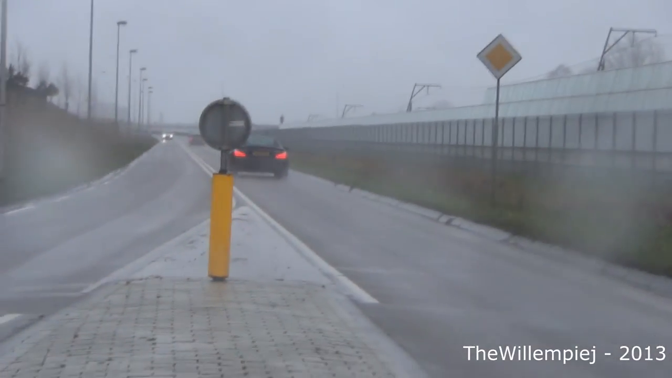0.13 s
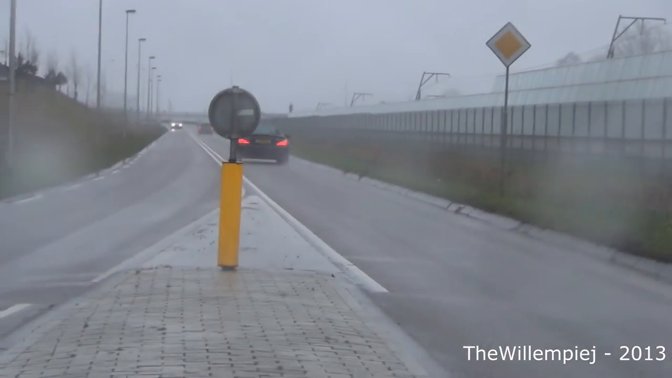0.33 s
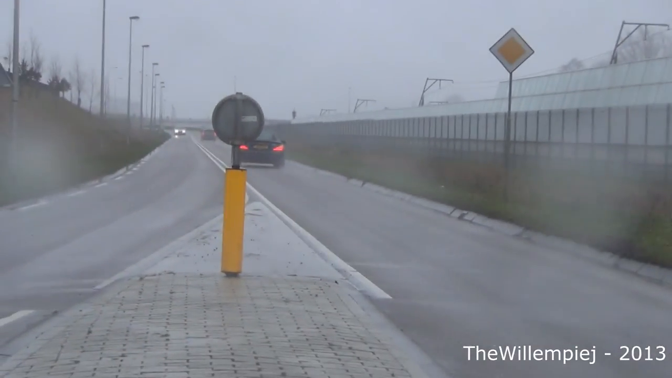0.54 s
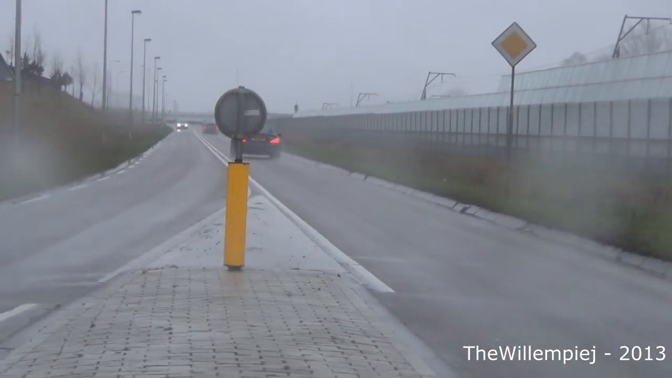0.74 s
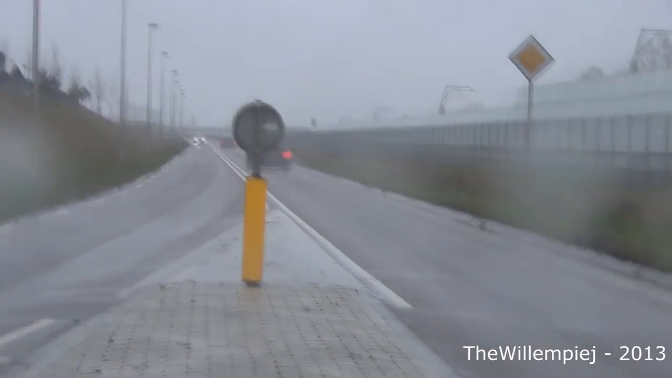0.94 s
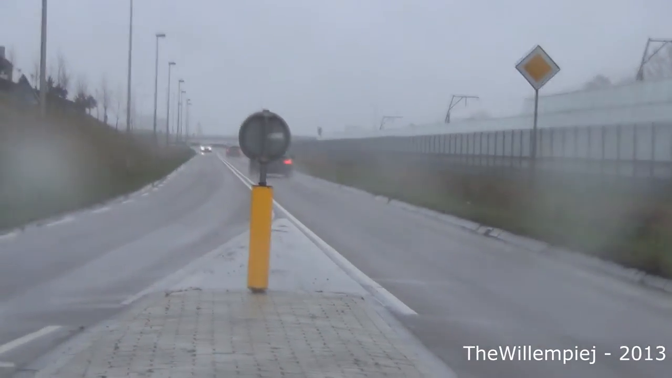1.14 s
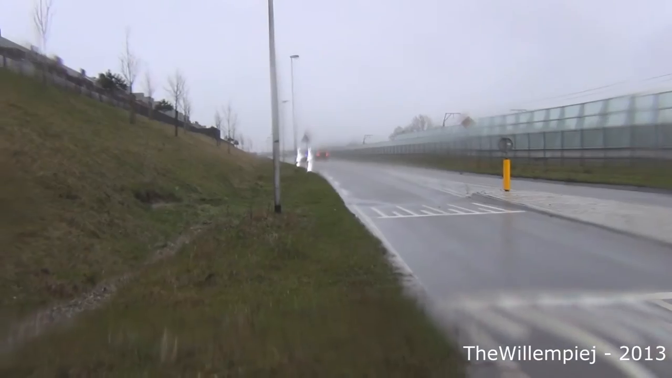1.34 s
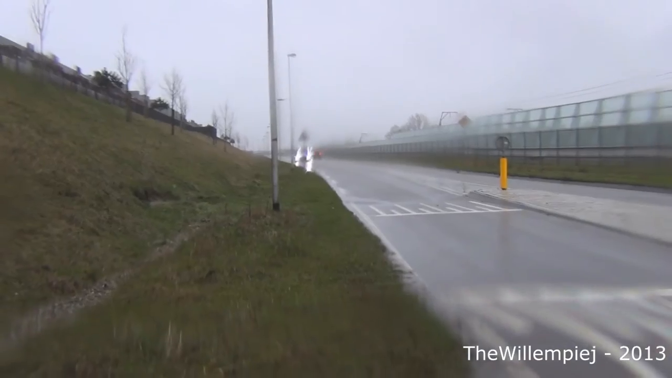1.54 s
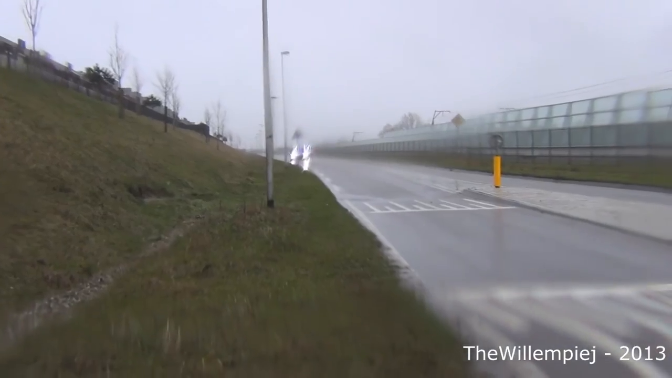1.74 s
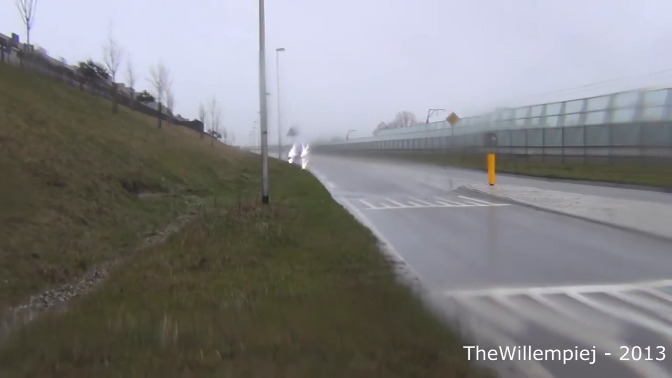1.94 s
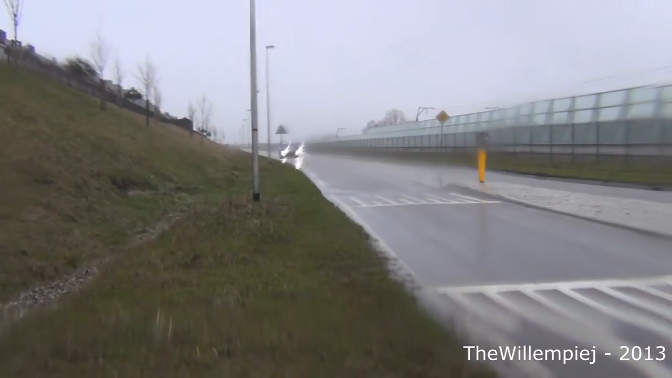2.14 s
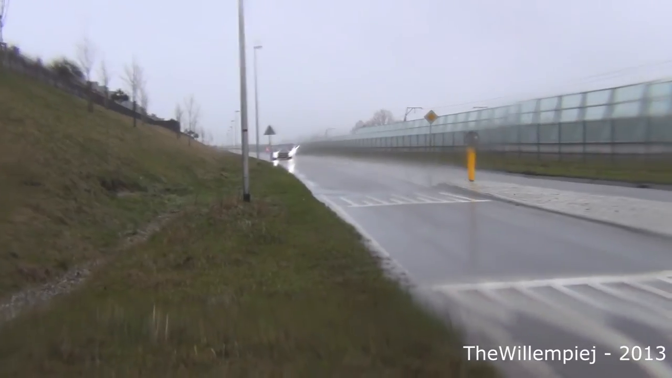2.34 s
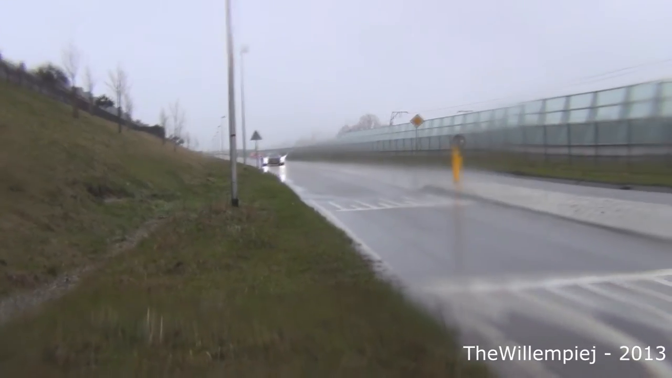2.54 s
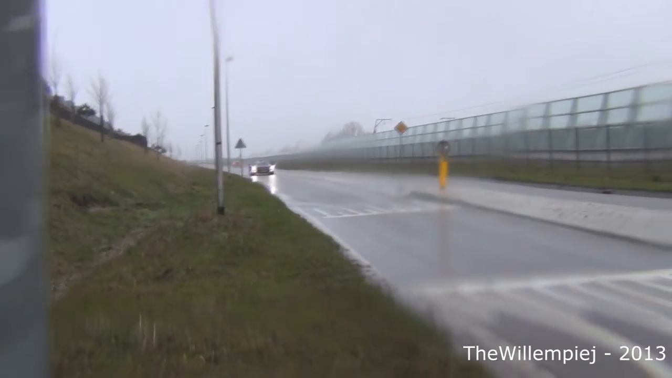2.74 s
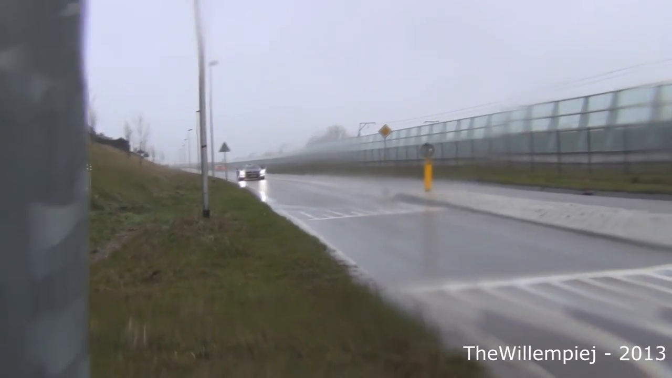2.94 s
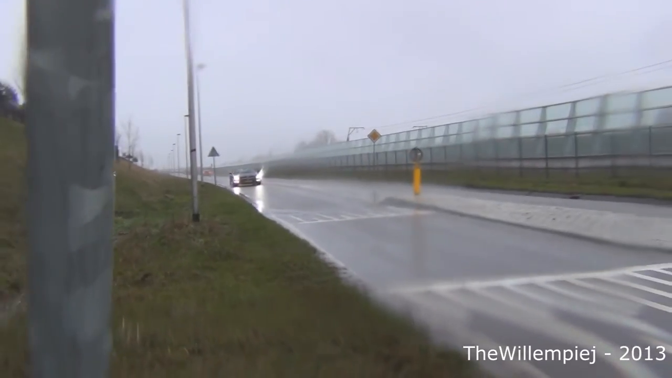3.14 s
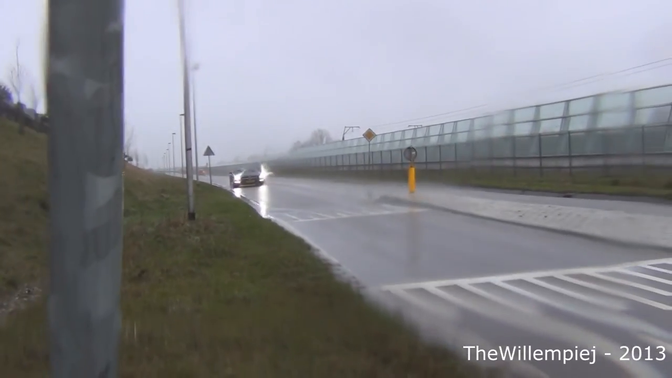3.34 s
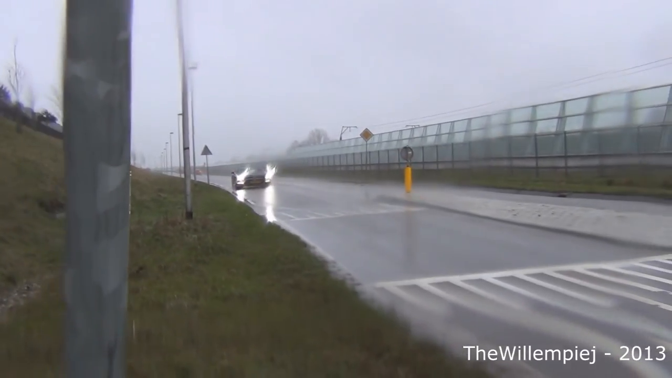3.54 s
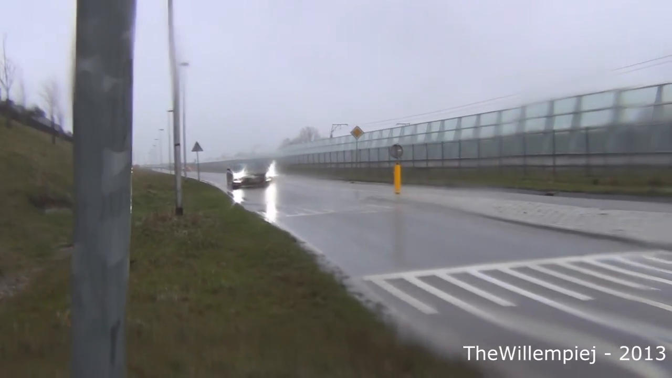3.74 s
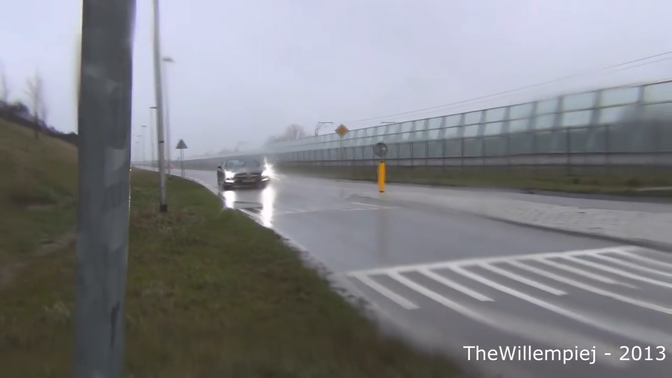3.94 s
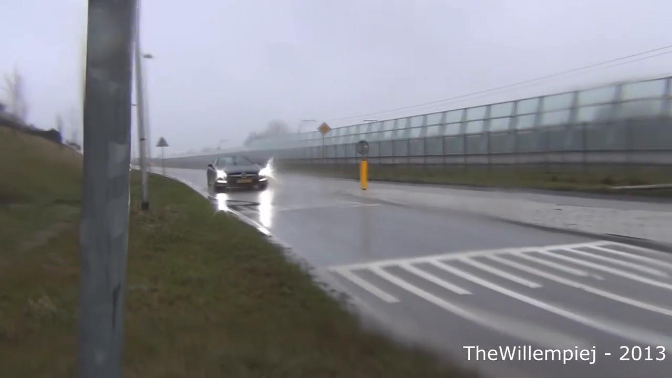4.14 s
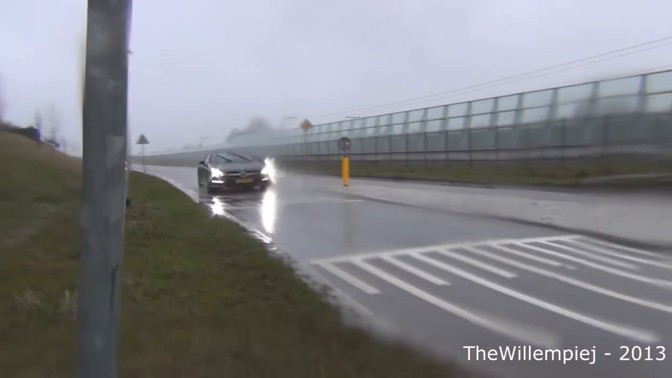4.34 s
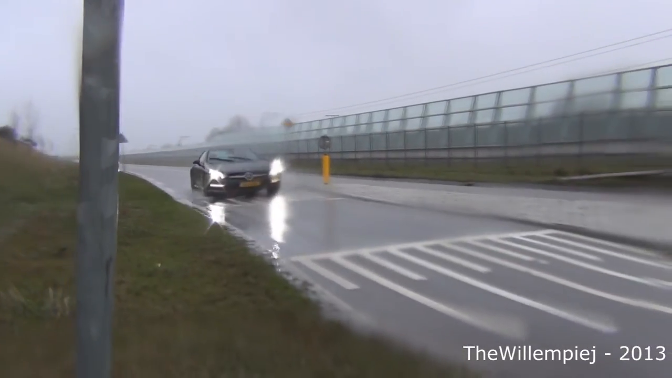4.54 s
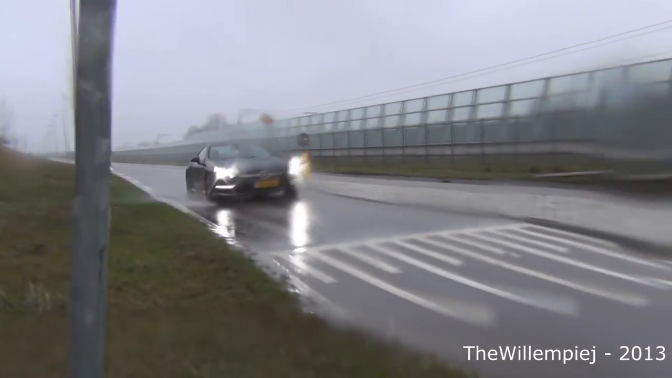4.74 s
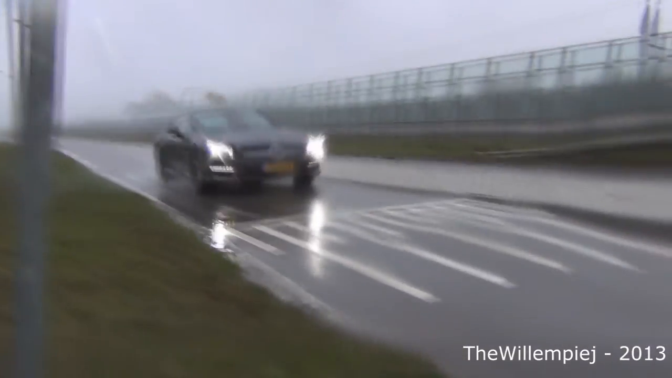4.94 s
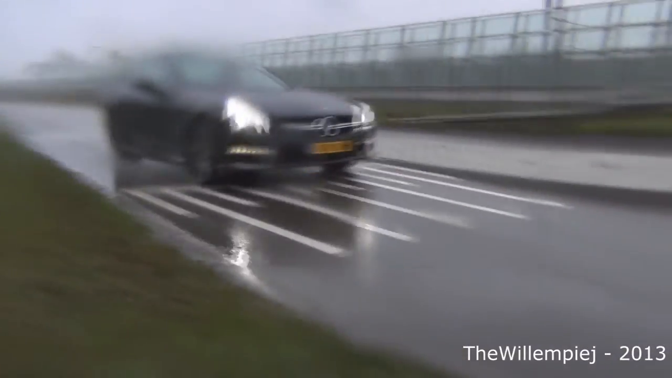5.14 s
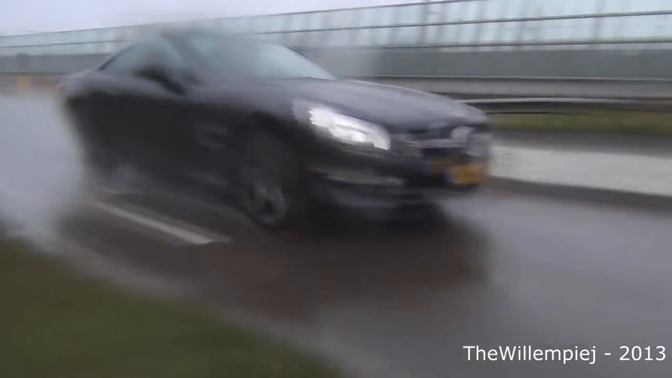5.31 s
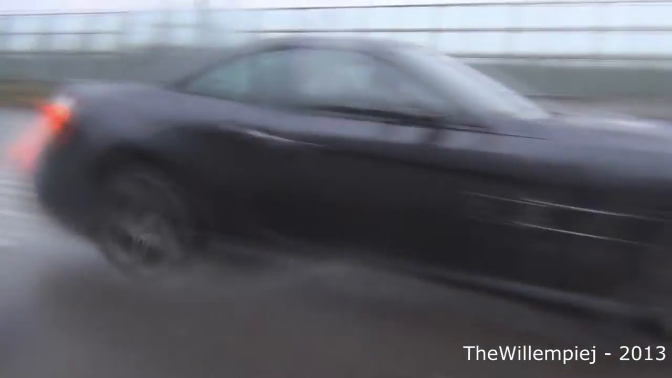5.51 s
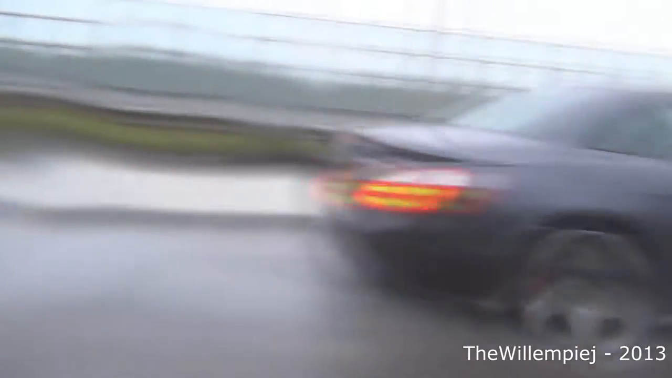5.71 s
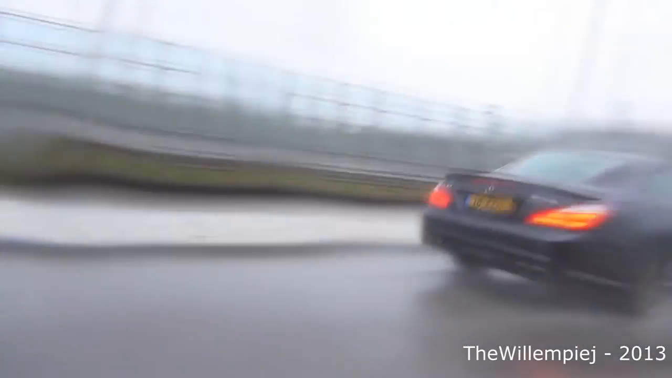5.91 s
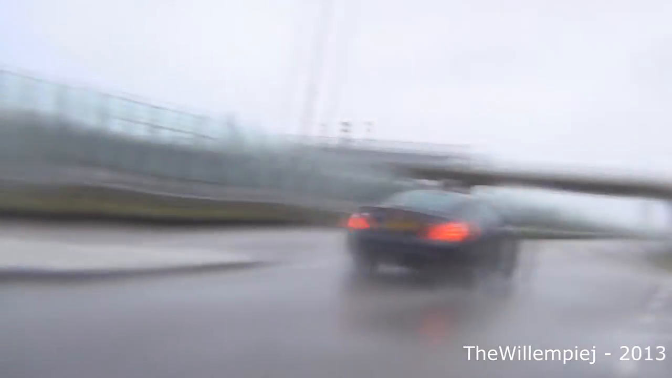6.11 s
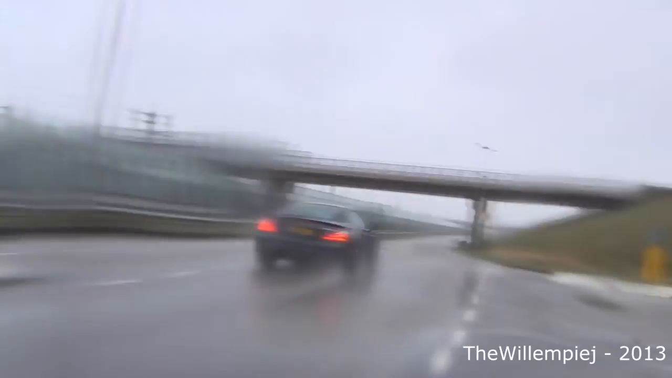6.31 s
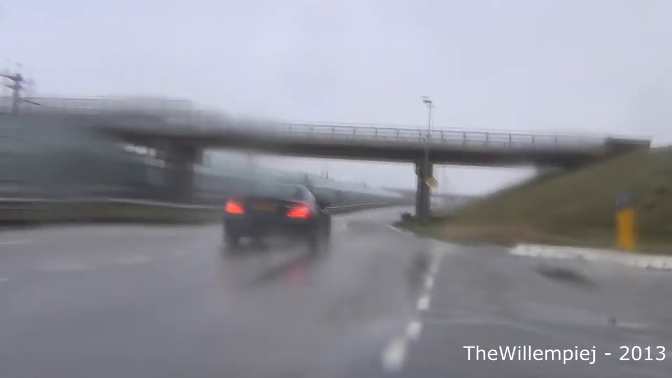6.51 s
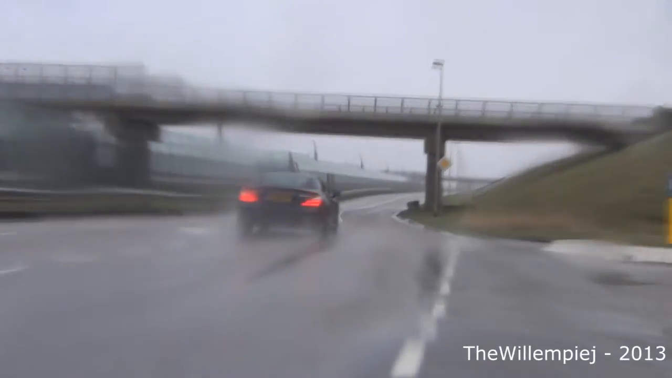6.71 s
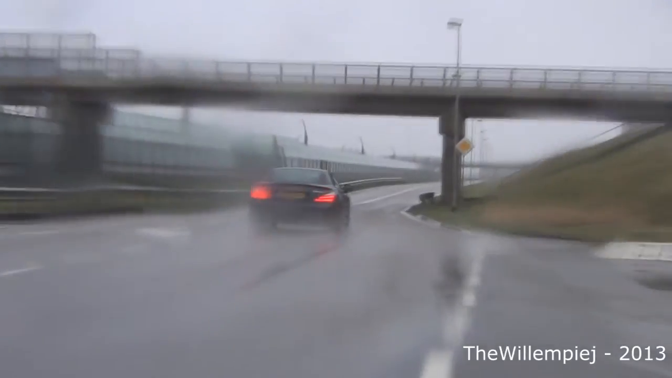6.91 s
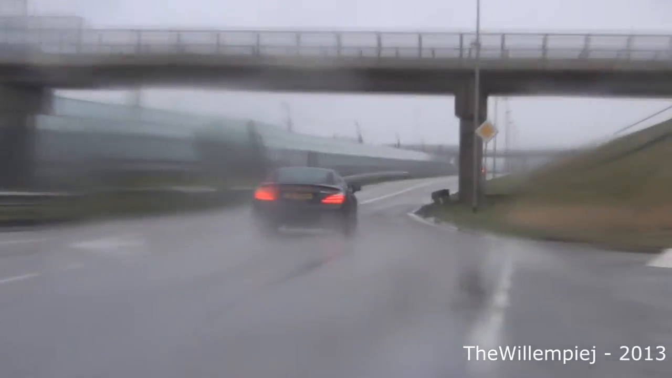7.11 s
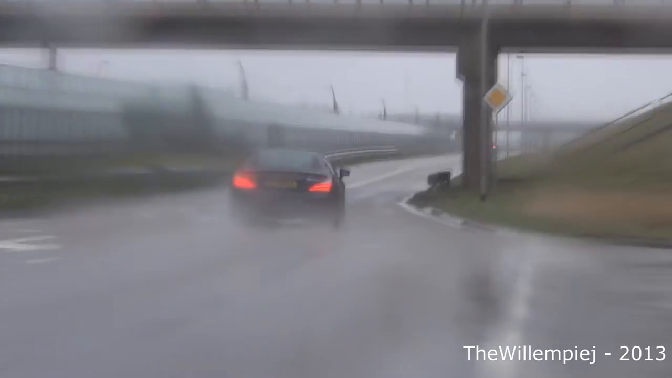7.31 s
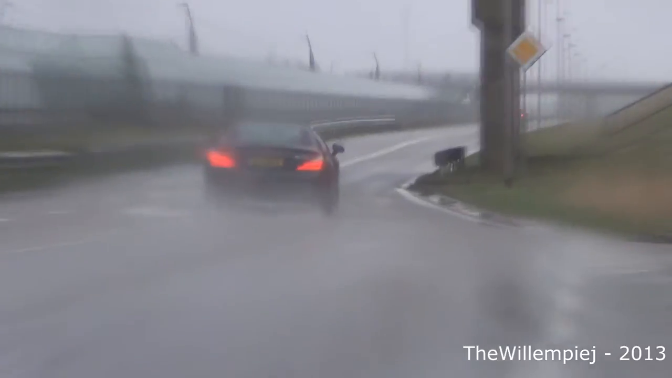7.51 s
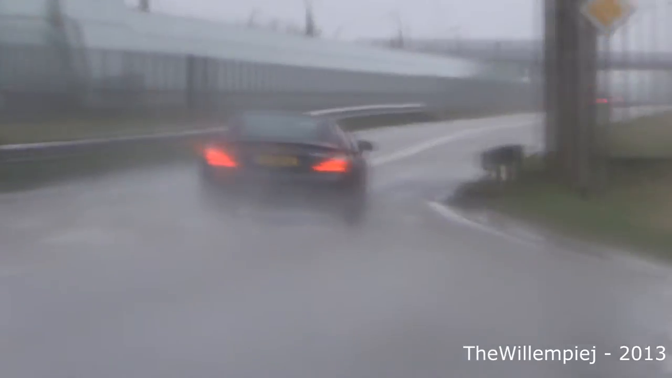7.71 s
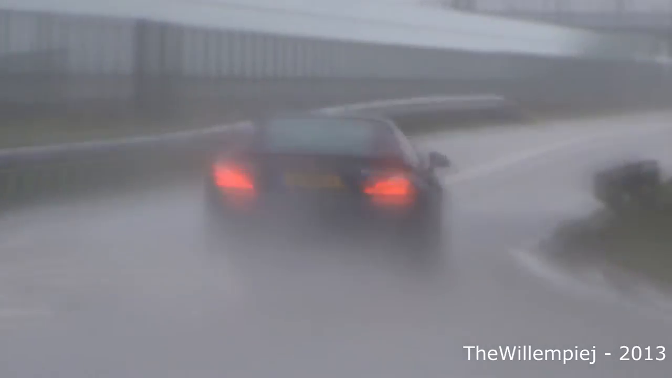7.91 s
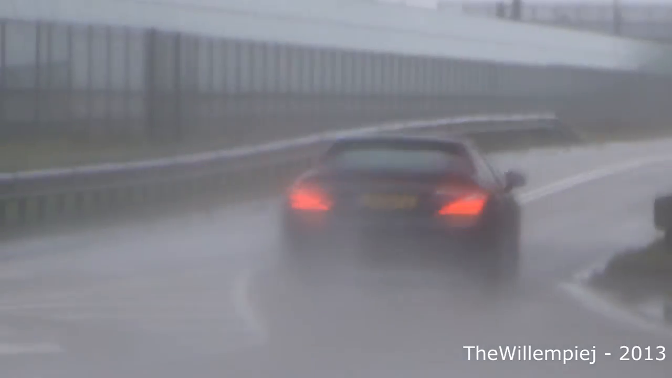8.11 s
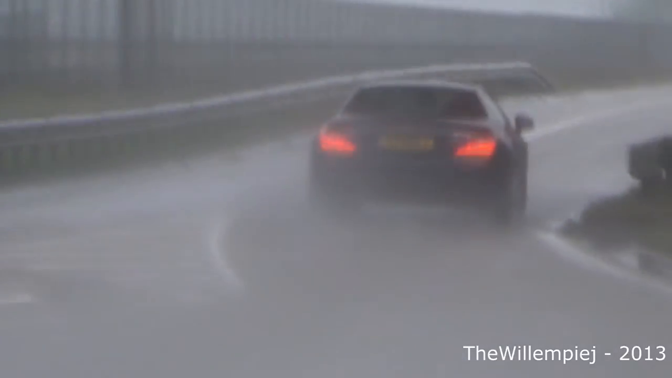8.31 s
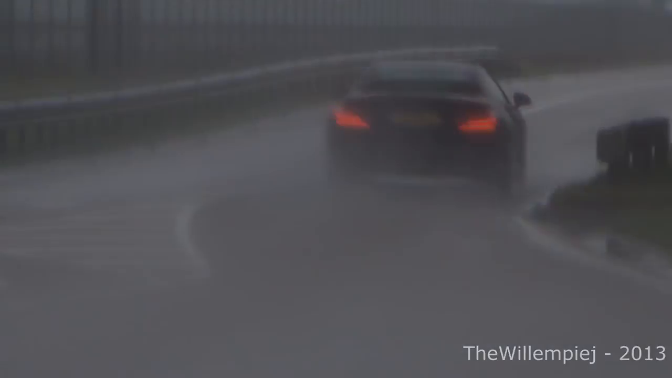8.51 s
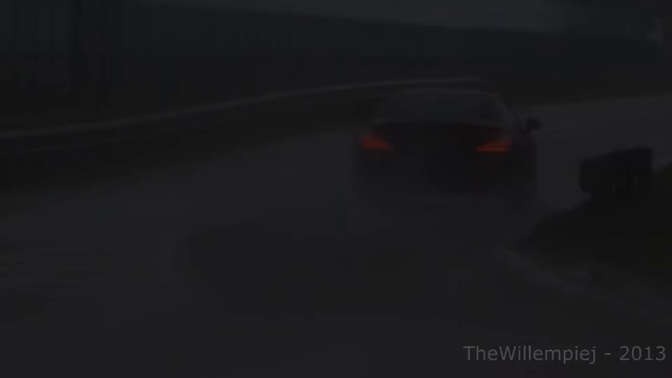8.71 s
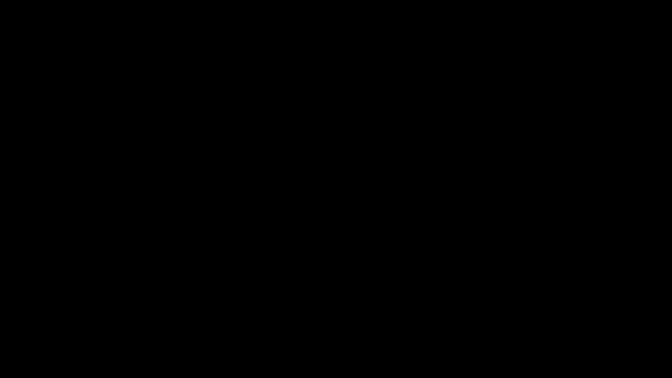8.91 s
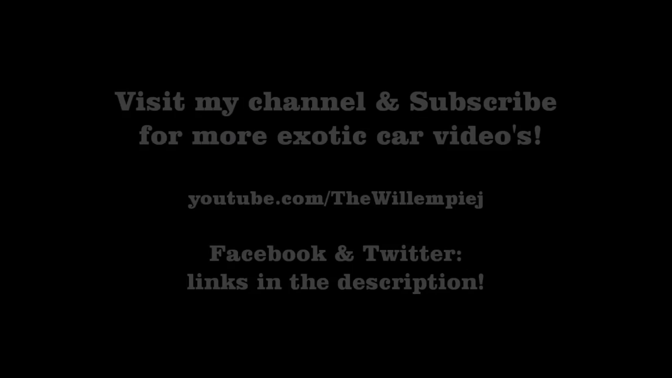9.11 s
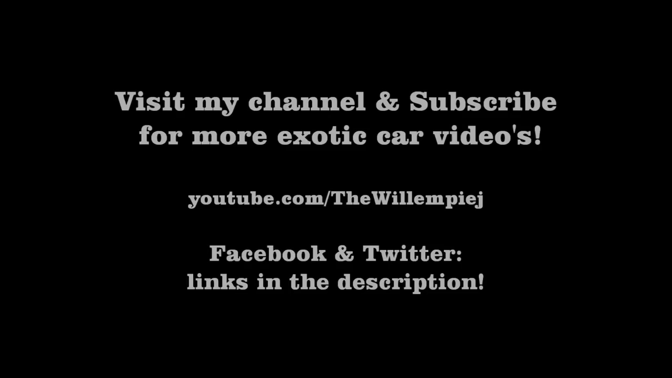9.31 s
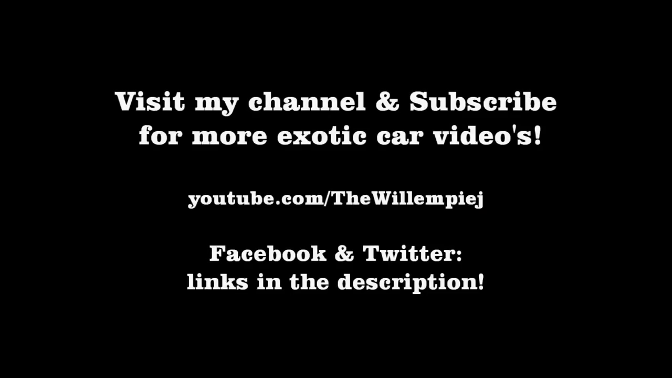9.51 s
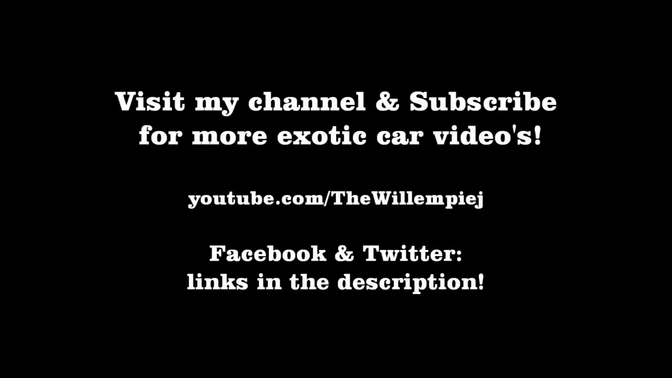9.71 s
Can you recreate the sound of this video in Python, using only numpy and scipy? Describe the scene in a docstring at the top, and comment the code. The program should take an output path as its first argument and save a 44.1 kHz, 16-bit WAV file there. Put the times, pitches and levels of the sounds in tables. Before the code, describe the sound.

From 0 to 1.3 s a powerful eight-cylinder car drives away on a soaked road: steady wet tyre roar and spray, with a hollow exhaust drone rising and strengthening, one small pop and a couple of raindrop clicks. A hard cut at 1.3 s leaves faint distant tyre hiss. From about 2 s exhaust pops appear, becoming a dense irregular crackle from 3 to 4.9 s as tread notes and spray grow; a splash jumps out at 4.65 s. It passes close at 5.5 s with broad watery roar, the engine flaring loudest around 5.6-5.9 s, with two brief tyre chirps and heavy puddle spray. Pitch drops by 6.3 s; tyres recede, splashing. The engine climbs again from 7 s, surging near 8.1 s, then eases into weak hiss, a faint late pop, and silence at 9 s. Low wind rumble stays very faint.

```python
"""The uneven firing of a V8 sounds as engine orders, a ringing tailpipe, throbbing gas noise and short pops.
The car drives away; a hard cut at 1.3 s, then it nears with a popping exhaust, passes close and pulls away.
Wet tyres add shaped noise: roar with an echo, spray, fine mist, tread notes and two slip chirps.
Puddles swell the spray and roar, raindrops click close by, and wind rumbles separately in each channel."""
import sys
import numpy as np
from scipy import signal
from scipy.fft import rfft, irfft, next_fast_len
from scipy.io import wavfile
from scipy.ndimage import uniform_filter1d, map_coordinates

SR = 44100
rng = np.random.default_rng(int(sys.argv[2]) if len(sys.argv) > 2 else 0)


def dump(signal):
    """Clip the signal to [-1, 1] and save it as 16-bit WAV at the path in sys.argv[1]."""
    limited = np.clip(np.atleast_2d(signal).T, -1, 1)
    pcm = np.round(limited * 32767).astype(np.int16)
    wavfile.write(sys.argv[1], SR, pcm)


N = 429970

# the two scenes: start t/s, end t/s
SCENES = [(0, 1.3), (1.3, 9.01)]
# engine, one list a scene, one cycle = two crank turns: t/s, cycle f/Hz, then level/dB of
# tone, boom, sixth order, firing (eighth) order, gas noise
ENGINE_RUNS = [
    [(0.0, 25.57, -42, -38, -53, -43, -39), (0.1, 26, -37, -30.5, -56, -48, -43),
     (0.17, 25.5, -44, -39, -49, -48, -44.5), (0.35, 25.24, -42, -45, -49, -56, -49.5),
     (0.82, 27.06, -47, -40, -47.5, -49, -46.5), (0.9, 27.14, -38, -38, -55, -46, -43.5),
     (1.08, 28.2, -35.5, -29.5, -49.5, -45, -39.5), (1.19, 28.8, -36, -28.5, -49, -44, -42),
     (1.295, 29.34, -34, -23, -58, -46, -37.5)],
    [(4.9, 33.8, -38, -51, -58, -57, -38.5), (5.15, 34.1, -50, -56, -48, -50, -58),
     (5.34, 34.72, -41, -30.5, -44, -40, -39.5), (5.45, 34.9, -45, -28.5, -61, -42, -45),
     (5.53, 38.72, -44, -38, -49, -49, -40), (5.6, 43.34, -34, -27, -51, -40, -34.5),
     (5.66, 44.4, -29, -22.5, -38, -32, -32), (5.71, 39.2, -25, -24, -38, -42, -31),
     (5.76, 33.8, -21.5, -21.5, -48, -35, -31.5), (5.81, 32.75, -25, -18, -42, -34, -33),
     (5.89, 32.82, -38, -34, -60, -39, -36.5), (5.98, 32.17, -34, -28, -36, -53, -30),
     (6.05, 31.5, -47, -27, -43, -54, -30.5), (6.12, 30.44, -43, -25.5, -35, -44, -40),
     (6.18, 27.25, -38, -23, -41.5, -34, -39), (6.27, 22.72, -44, -31.5, -44, -32.5, -38),
     (6.37, 22.9, -31, -52, -46, -35, -41), (6.44, 22.72, -45, -39, -56, -43, -28.5),
     (6.52, 22.84, -37, -48, -49, -38, -40.5), (6.7, 23.27, -45, -48, -54, -44, -49),
     (6.94, 24.33, -41, -41, -58, -46, -36), (7.2, 25.28, -40, -42, -60, -52, -40),
     (7.33, 26.11, -39, -34, -52, -53, -38.5), (7.39, 26.5, -31.5, -28.5, -43, -44, -41.5),
     (7.61, 27.76, -39.5, -33, -45, -45, -36), (7.79, 28.66, -34, -30, -40, -41, -36.5),
     (7.93, 31.14, -34, -33.5, -37, -45, -35.5), (8.0, 33.65, -30, -29, -45, -51, -35.5),
     (8.06, 35.92, -31, -31.5, -36, -35, -36.5), (8.12, 36.9, -32, -30, -48, -41, -31),
     (8.23, 32.7, -50, -36.5, -52, -55, -36.5), (8.41, 30.3, -48, -55, -63, -61, -49),
     (8.6, 31.04, -55, -43.5, -51, -57, -50.5), (8.75, 30.7, -52, -42, -52, -57, -42),
     (9.01, 32, -56, -46.5, -62, -61, -49.5)],
]
# weak orders: multiple of the cycle, relative level/dB
WEAK_ORDERS = [(5, -12.5), (7, -5), (9, -15.5), (11, -11), (12, -7.5), (15, -5), (16, -7.5)]
# stronger orders: multiple of the cycle, level over the tone/dB, gain as the car draws level/dB
STRONG_ORDERS = [(3, -27, 21), (4, -22, 9), (10, -11, 2), (13, -8, 0)]
# fourteenth order: t/s, level/dB
FOURTEENTH_ORDER = [(0, -52), (.08, -40), (.35, -45), (.55, -43), (.8, -53), (1.29, -52), (5, -63),
                    (7.2, -57), (7.45, -47), (7.7, -57), (9, -68)]
# tailpipe boom as heard: t/s, centre f/Hz, width/Hz
PIPE_RESONANCE = [(0, 585, 62.5), (.8, 583.6, 61.5), (1.1, 587, 95.2), (1.29, 587, 100.3), (5.1, 644, 40),
                  (5.5, 659.6, 40.1), (5.63, 640, 60.3), (5.72, 650, 110), (5.82, 635, 109.7),
                  (5.92, 670, 140.2), (6.1, 624, 120.8), (6.2, 595.6, 79.7), (6.3, 591, 70),
                  (6.7, 488.7, 62.5), (7, 510.8, 55), (7.2, 528, 55), (7.4, 548.5, 65), (7.55, 562, 60),
                  (7.7, 583, 50), (7.88, 625, 60), (8.05, 551, 150), (8.2, 573, 120), (9, 594, 69.3)]
# share of the boom's power that rings in clean orders: t/s, share (0-1)
CLEAN_SHARE = [(0, .5), (.8, .9), (1.29, .96), (5.5, .96), (5.6, .3), (5.7, .4), (5.77, .6), (5.86, .6),
               (5.95, .4), (6.1, .65), (6.17, .4), (6.3, .4), (7.15, .6), (7.4, .97), (7.88, .97),
               (8.0, .4), (9, .3)]
# rasp of the gas as the engine pulls: t/s, then level/dB of upper mode, next mode, highest modes
RASP_LEVELS = [(0, -31.5, -35.5, -57), (.45, -34.5, -39, -56), (.8, -40, -53.5, -50),
               (1.29, -33.5, -49, -50), (5.3, -44, -40.5, -39), (5.61, -37, -57, -26.5),
               (5.72, -37, -36, -29.5), (5.82, -46, -44.5, -40.5), (6.0, -42, -34, -37.5),
               (6.12, -51, -41, -41), (6.25, -35, -45.5, -46), (6.5, -39, -42, -42), (7.0, -44, -41, -51),
               (7.2, -36.5, -41, -58), (7.33, -37, -41, -38), (7.46, -34, -40, -32),
               (7.58, -35, -42.5, -34.5), (7.68, -35.5, -35.5, -36.5), (7.75, -36, -36, -33.5),
               (7.86, -31, -31.5, -30), (7.96, -36, -33.5, -33.5), (8.02, -36, -30, -31.5),
               (8.1, -35, -30.5, -28.5), (8.22, -44, -36, -45), (8.4, -50, -40, -45), (9, -48, -42.5, -52)]
# level of the mode just above the boom: t/s, level/dB
HOWL_LEVEL = [(0, -38.5), (.7, -46.5), (1.29, -45.5), (5.3, -43), (5.55, -36.5), (5.63, -28), (5.75, -23.5),
              (5.84, -37.5), (5.92, -36.5), (6.03, -29.5), (6.15, -38.5), (6.3, -39.5), (6.9, -49),
              (7.45, -42.5), (8.1, -46), (8.3, -56), (9, -56.5)]
# pipe modes, whose responses are squared in use: centre f/Hz, width/Hz, level before squaring/dB
HOWL_MODE = [(736, 210, 0)]
UPPER_MODE = [(962, 190, 0)]
NEXT_MODE = [(1433, 340, 0)]
HIGHEST_MODES = [(1900, 490, -1.5), (2402, 240, 4), (2640, 350, 0.5)]
# colour of the gas noise under the orders: f/Hz, relative level per Hz/dB
GAS_COLOUR = [(60, -35.5), (120, -13), (170, -5), (240, -4), (330, -4), (450, -4), (550, -1), (900, -51.5)]
# unburnt fuel popping in the pipe: t/s, relative level/dB, centre f/Hz, relative crack level/dB
POP_EVENTS = [(0.873, -18.5, 420, -8), (2.133, -46, 250, -14), (2.19, -43, 400, -10),
              (2.367, -37, 280, -14), (2.396, -35, 300, -12), (2.488, -30.5, 237, -16),
              (2.551, -26, 382, -14), (2.642, -30.5, 465, -12), (2.676, -24, 430, 1), (2.679, -23, 820, 11),
              (2.685, -49, 237, -5), (2.79, -27, 255, -10), (2.818, -29, 351, -13), (2.906, -18, 197, -11),
              (2.995, -20, 317, -10), (3.004, -17.5, 510, -17), (3.026, -19, 453, -13),
              (3.072, -26, 277, -12), (3.124, -17.5, 393, -5), (3.143, -27, 370, -13),
              (3.207, -25.5, 286, -12), (3.283, -28.5, 385, -10), (3.354, -20, 544, -9),
              (3.494, -29, 471, -11), (3.517, -17, 450, -7), (3.529, -25, 530, 15), (3.544, -21, 351, 12),
              (3.575, -20.5, 310, 8), (3.638, -15, 337, -2), (3.676, -22.5, 310, -12),
              (3.823, -18.5, 299, -12), (3.842, -18.5, 520, -5), (3.859, -19.5, 380, -12),
              (3.905, -15.5, 366, 8), (3.967, -16, 566, -10), (4.009, -27.5, 649, -10),
              (4.073, -22, 632, 9), (4.139, -17.5, 398, 9), (4.161, -23, 614, -4), (4.182, -18, 610, 3),
              (4.214, -21.5, 566, -3), (4.263, -15.5, 248, 3), (4.28, -17, 350, 7), (4.295, -33, 589, 24),
              (4.379, -26, 775, -3), (4.424, -30, 220, -10), (4.474, -19, 403, -5), (4.492, -24, 460, -8),
              (4.505, -16.5, 352, 6), (4.55, -28.5, 764, -2), (4.585, -18, 624, 6), (4.609, -19, 310, 15),
              (4.639, -27.5, 711, -2), (4.675, -22, 425, -9), (4.728, -20.5, 358, -6),
              (4.816, -24.5, 727, -6), (4.908, -23.5, 478, -12), (5.073, -23.5, 813, 11),
              (5.945, -25, 169, -10), (6.926, -24, 400, -10), (7.3, -21, 319, -9), (8.733, -32, 208.3, -14)]
# small pops and distant rumble: t/s, level/dB
BURBLE_LEVEL = [(1.3, -62.5), (1.95, -47), (2.2, -52.5), (2.45, -48.5), (2.8, -45.5), (3.0, -37.5),
                (3.24, -52), (3.55, -34), (3.74, -43.5), (4.05, -33), (4.35, -38.5), (5.3, -38)]
# colour of puffs and burble: f/Hz, relative level per Hz/dB
PUFF_COLOUR = [(40, -41), (100, -9), (250, 1.5), (450, 1), (800, -1), (1500, -49.5)]
# tyres, one list a scene: t/s, roar level/dB, spray level/dB (before splashes and mixing)
TYRE_LEVELS = [
    [(0.0, -25.5, -30.5), (0.6, -24, -27.5), (0.85, -24, -28.5), (1.07, -22.5, -27), (1.295, -22.5, -28.5)],
    [(1.3, -34, -43), (1.75, -36, -42.5), (2.4, -35.5, -38.5), (2.9, -33, -38.5), (3.5, -32.5, -32.5),
     (3.81, -32, -38.5), (4.18, -30.5, -32), (4.5, -28, -29), (4.645, -28, -28.5), (4.655, -24, -27),
     (4.76, -27, -24.5), (4.9, -24, -20.5), (5.4, -21, -19.5), (5.68, -26, -21.5), (5.9, -23, -21),
     (6.15, -24, -21.5), (6.33, -25, -23), (6.49, -26.5, -26), (6.6, -28.5, -30.5), (6.71, -32.5, -35.5),
     (6.86, -29.5, -34), (7.08, -29.5, -29.5), (7.2, -31.5, -33), (7.3, -30.5, -33), (7.6, -31.5, -36),
     (7.97, -33, -38.5), (8.17, -29.5, -36), (8.42, -36, -40.5), (9.01, -39.5, -44.5)],
]
# where the car is heard: t/s, roar left over right/dB, spray left over right/dB
TYRE_PLACE = [(0.0, 1.5, 1.5), (0.53, 3.5, 4.5), (0.85, 8, 4.5), (1.29, 8, -5), (1.31, 0.5, 1.5),
              (1.75, 0.5, 1), (2.5, 1.5, 0), (3.2, 1, 2), (3.7, 1, 0.5), (4.3, 1.5, 0), (5.3, 2.5, 1.5),
              (5.75, 1, -2.5), (6.04, -4, -3.5), (6.5, -1, -1), (6.8, 0.5, -2), (7.3, 1.4, -0.5),
              (9, 0.5, 0)]
# roar colour from the front and from the rear: f/Hz, relative level per Hz/dB
FRONT_COLOUR = [(60, -46.5), (110, -32), (170, -15), (400, -25.5), (750, -5), (1100, -2), (1650, -2.5),
                (2100, -7), (2750, -3.5), (3400, -13), (4300, -11), (5000, -10), (8000, -53.5)]
REAR_COLOUR = [(60, -44), (110, -32.5), (170, -19.5), (400, -12.5), (750, 0.5), (1000, 0.5), (1500, -1.5),
               (1900, -4.5), (2600, -4), (3400, -8), (4300, -11.5), (5000, -11), (8000, -54.5)]
# spray and mist colour: f/Hz, relative level per Hz/dB
SPRAY_COLOUR = [(1500, -20.5), (3500, -11), (4500, -10), (5400, -3), (7200, -3), (8300, -6.5), (10000, -18),
                (12000, -44.5)]
MIST_COLOUR = [(7000, -18.5), (9500, -4.5), (11000, -9.5), (13000, -19), (15500, -35)]
# where the spray hisses brightest: t/s, centre f/Hz
FIZZ_CENTRE = [(0, 6310), (.65, 6330), (1, 7400), (1.29, 7585), (1.31, 6490), (1.8, 6790), (3.5, 6520),
               (4.5, 7200), (4.66, 5590), (4.9, 6280), (5.35, 6500), (5.55, 7210), (5.9, 7210),
               (6.15, 6740), (6.5, 6300), (7, 6802), (7.4, 6596), (8, 6300), (9, 6280)]
# level of the mist over its rule: t/s, level/dB
MIST_EXCESS = [(0, 0.5), (.6, -5), (1, 3.5), (1.29, 3.5), (1.31, 2.5), (1.5, -8.5), (3, -3.5), (4.3, -0.5),
               (4.65, 4.5), (5.5, 3), (6.5, -3.5), (7.5, -0.5), (9, -8)]
# tread notes of the approaching tyres: t/s, then level/dB of the lower, middle and upper note
TREAD_LEVELS = [(1.3, -64, -66.5, -66), (1.81, -40, -55, -64), (2.2, -35.5, -41, -46),
                (2.54, -33, -33.5, -40), (2.7, -36.5, -34, -38), (2.9, -37, -31, -43),
                (3.2, -40, -34.5, -41), (3.55, -51, -40.5, -38), (4.33, -31.5, -41.5, -57),
                (4.67, -25.5, -28, -30), (4.76, -32, -32, -31.5), (5.2, -32.5, -29.5, -41.5)]
# pitch of those notes: centre f/Hz, width/Hz
TREAD_BANDS = [(1626, 330), (2090, 345), (2720, 610)]
# a tyre slips: t/s, level/dB, centre f/Hz, time from peak to 1/e/s
SLIP_CHIRPS = [(5.623, -20, 2726, 0.035), (5.7, -23.5, 2620, 0.022)]
# a wheel ploughs through a puddle: t/s, peak level/dB, rise time/s, decay time/s
PUDDLES = [(1.039, -31.5, 0.012, 0.057), (4.65, -22, .003, 0.06), (5.51, -18, 0.035, .1),
           (5.87, -24, 0.073, 0.069), (6.11, -22, .04, .07), (6.96, -30, 0.056, 0.084),
           (7.025, -26.5, 0.0087, .03), (7.4, -26.5, 0.032, 0.06), (7.46, -34, 0.0095, .04),
           (7.565, -30.5, .04, .05), (8.055, -31, 0.026, 0.1), (8.28, -36.5, .05, 0.06),
           (8.499, -41.5, 0.034, .05)]
# raindrops: t/s, relative level/dB, lower edge of the click's band f/Hz
RAINDROPS = [(.777, -26, 5500), (0.829, -16.5, 5470), (1.3424, -34, 8500), (1.6546, -48.5, 7960),
             (2.046, -39, 7500), (2.1006, -34.5, 7000), (7.448, -22.5, 5500)]
# likeness of left and right before the width gain: f/Hz, correlation (0-1)
LIKENESS = [(40, .5), (110, 0.94), (250, 0.93), (700, 1), (1600, 0.94), (2600, 1), (5000, 1), (6000, 0.93),
            (8000, 0.91), (9000, 1), (11000, .999)]
# gain of the side signal: t/s, then level/dB of bass, middle, treble
SIDE_GAIN = [(0, -3.5, 3, 6), (.5, 2, 3, 9), (1.29, -0.5, 6, 16), (1.31, 7, -10, 4), (3, 3, 1, 4.5),
             (5.3, 2.5, 4, 4.5), (6, 3, -4, -1), (6.5, 4, -17, -0.5), (7.5, 0.5, -7, 1), (9, 0, -2, 0.5)]
# where bass, middle and treble lie: f/Hz
SIDE_HZ = [500, 2500, 7000]
# colour of the wind: f/Hz, relative level per Hz/dB
WIND_COLOUR = [(20, -14), (50, -4.5), (80, 2.5), (130, -6), (250, -44.5)]

EXHAUST_PAN_DB = -0.5  # left over right; the exhaust stays put
WEAK_DB = -6  # all weak orders together, over the tone
PASS_S, NEAR_S, TURN_S = 5.5, 0.22, 0.28  # car draws level; how long it is close; front gives way to rear
BARRIER_HZ, BARRIER_SHARE = 521, 0.061  # echo from the barrier: spacing of the comb, relative amplitude
SPLASH_ROAR_DB = -7.5  # low roar of a splash, over its spray
FIZZ_WANDER_HZ = 120  # scale of the random wander
MIST_DB, MIST_GROWS = -44, 0.88  # mist under a spray of -28 dB; dB of mist per dB of spray
PORT_HZ = 800  # below about this both channels hear the roar alike
WIND_DB, DRAUGHT_DB, DRAUGHT_S = -61.5, 5, 0.5  # steady wind; the passing car's draught and its length
TOP_HZ, LOW_CUT_HZ = 15800, 85  # limits of the output band


def engine():
    """Periodic uneven firing: a Fourier series of cycle orders excites the pipe and modulates gas noise."""
    cycles_hz, tone_db, boom_db, sixth_db, firing_db, gas_db, on = curves(*ENGINE_RUNS)
    phase = 2 * np.pi * np.cumsum(cycles_hz * (1 + 0.002 * wobble(15))) / SR
    throb = unit(np.exp(0.7 * np.cos(phase - 0.8) + 0.2 * wobble(30)))
    orders = engine_orders(phase, tone_db, sixth_db, firing_db)
    rumble = amp(gas_db) * throb ** 0.32 * rush(GAS_COLOUR, depth_db=2.0)
    boom = amp(boom_db + 0.4 * wobble(14)) * tailpipe(phase, cycles_hz)
    return on * (orders + rumble + boom + gas_rasp(throb))


def engine_orders(phase, tone_db, sixth_db, firing_db):
    """Harmonic synthesis: sines at multiples of the cycle frequency, each with its own wandering level."""
    def partial(k):
        rough = amp(1.5 * wobble(6) + 1.5 * wobble(22))
        return np.sqrt(2) * rough * np.sin(k * phase + rng.uniform(0, 2 * np.pi))

    lead = amp(sixth_db) * partial(6) + amp(firing_db) * partial(8)
    lead = lead + amp(curves(FOURTEENTH_ORDER)[0]) * partial(14)
    strong = sum(amp(db + close_db * near(NEAR_S)) * partial(k) for k, db, close_db in STRONG_ORDERS)
    weak = sum(amp(db + 1.4 * wobble(2.8)) * partial(k) for k, db in WEAK_ORDERS)
    return lead + amp(tone_db) * (strong + amp(WEAK_DB) * unit(weak))


def tailpipe(phase, cycles_hz):
    """Forced resonance: one strong blow a cycle rings the pipe's orders; a noisy drone fills the rest."""
    pipe_hz, width_hz, _ = curves(PIPE_RESONANCE)
    clean = curves(CLEAN_SHARE)[0]
    ring = 0
    for k in range(12, 32):
        detuning = (k * cycles_hz - pipe_hz) / width_hz
        response = np.sqrt(62 / width_hz) / (1 + 2j * detuning) ** 2
        order_gain = amp(4.5 * (k % 2) + wobble(2))  # odd orders are favoured
        ring = ring + order_gain * np.real(response * np.exp(1j * k * phase))
    blown = band(pipe_hz, width_hz=80)
    limited = np.tanh(1.5 * blown)  # a hard-blown pipe holds its level
    drone = unit(filtered(limited, modes([(630, 300, 0)])))
    return np.sqrt(clean) * unit(ring) + np.sqrt(1 - clean) * drone


def gas_rasp(throb):
    """Flow noise through resonances: turbulence, modulated at the cycle rate, excites the upper pipe modes."""
    upper_db, next_db, highest_db, _ = curves(RASP_LEVELS)

    def gas(table):
        response = modes(table)
        return unit(filtered(throb ** 0.35 * rng.standard_normal(N), lambda hz: response(hz) ** 2))

    rasp = amp(upper_db + 0.97 * wobble(10)) * gas(UPPER_MODE)
    rasp = rasp + amp(curves(HOWL_LEVEL)[0] + wobble(12)) * gas(HOWL_MODE)
    rasp = rasp + amp(next_db + 0.82 * wobble(14)) * gas(NEXT_MODE)
    return rasp + amp(highest_db + 1.7 * wobble(18)) * gas(HIGHEST_MODES)


def pops():
    """Impulse response of a damped pipe: each pop is a decaying sine, a puff and a crack, over a burble."""
    out, t = np.zeros(N), np.arange(SR // 20) / SR
    puffs = rush(PUFF_COLOUR, depth_db=0.5)
    for s, db, hz, crack_db in POP_EVENTS:
        i = round(s * SR)
        # each part falls 60 dB in the time it is divided by
        push = np.sin(2 * np.pi * hz * t) * amp(-60 * t / 0.022)
        puff = 0.5 * puffs[i:i + len(t)] * amp(-60 * t / 0.074)
        crack = amp(crack_db + 6.5) * np.sin(2 * np.pi * 1050 * t) * amp(-60 * t / 0.0054)
        onset = 1 - np.exp(-t / 0.0018)
        out[i:i + len(t)] += amp(db + 1.5) * onset * (push + puff + crack)
    level_db, on = curves(BURBLE_LEVEL)
    flutter = unit(amp(2.8 * wobble(55)))
    return out + on * amp(level_db) * flutter * rush(PUFF_COLOUR, depth_db=1.0)


def tyres():
    """Superposition of noise sources: roar and tread notes, with panned spray and centred mist above them."""
    roar_db, spray_db, _ = curves(*TYRE_LEVELS)
    pan_db, spray_pan_db, _ = curves(TYRE_PLACE)
    splash = splashes()
    wet_db = 20 * np.log10(np.hypot(amp(spray_db), splash)) + 0.7 * wobble(9)
    roar = tyre_roar(roar_db, splash)
    spray, mist = spray_and_mist(wet_db)
    low = filtered(roar, lambda hz: 1 / (1 + (hz / PORT_HZ) ** 6))
    return low + panned(roar - low + tyre_notes(), pan_db) + panned(spray, spray_pan_db) + mist


def tyre_roar(roar_db, splash):
    """Interference: broadband roar adds to its own delayed reflection off a barrier, making a faint comb."""
    rear = behind()
    front_sound = np.sqrt(1 - rear) * rush(FRONT_COLOUR, depth_db=1.4)
    direct = front_sound + np.sqrt(rear) * rush(REAR_COLOUR, depth_db=1.0)
    echo = map_coordinates(direct, [np.arange(N) - SR / BARRIER_HZ], mode="mirror")
    level = np.hypot(amp(roar_db + 0.23 * wobble(16)), amp(SPLASH_ROAR_DB) * splash)
    return level * unit(direct + BARRIER_SHARE * echo)


def spray_and_mist(wet_db):
    """Granular modulation: droplets roughen high noise; the level of the mist follows that of the spray."""
    grain = unit(amp(0.94 * wobble(500)))
    fizz_hz = curves(FIZZ_CENTRE)[0] + FIZZ_WANDER_HZ * wobble(3)
    hiss = 0.85 * rush(SPRAY_COLOUR, depth_db=2.0) + 0.52 * band(fizz_hz, width_hz=1800)
    spray = amp(wet_db) * grain * hiss
    mist_db = MIST_DB + MIST_GROWS * (wet_db + 28.0) + curves(MIST_EXCESS)[0]
    return spray, amp(mist_db) * grain * rush(MIST_COLOUR, depth_db=2.0)


def tyre_notes():
    """Narrow-band excitation: tread notes and brief slip chirps are noise gathered about fixed centres."""
    *notes_db, on = curves(TREAD_LEVELS)
    song = 0
    for db, (hz, width) in zip(notes_db, TREAD_BANDS):
        song = song + on * amp(db) * band(np.full(N, hz), width)
    t = np.arange(N) / SR
    for s, level_db, centre_hz, length in SLIP_CHIRPS:
        bell = np.exp(-((t - s) / length) ** 2)
        song = song + amp(level_db) * bell * band(np.full(N, centre_hz), width_hz=380)
    return song


def splashes():
    """Transient envelope: each puddle's amplitude grows, then decays, exponentially about its peak."""
    t = np.arange(N) / SR
    return sum(amp(db) * np.exp(-np.abs(t - s) / np.where(t < s, rise, fall))
               for s, db, rise, fall in PUDDLES)


def behind():
    """Directivity: share of the roar's power from the rear, all in the first scene and rising with the pass."""
    t = np.arange(N) / SR
    return np.where(t < SCENES[0][1], 1, 1 / (1 + np.exp((PASS_S - t) / TURN_S)))


def near(length):
    """Proximity: a Gaussian bell around the moment the car draws level."""
    return np.exp(-((np.arange(N) / SR - PASS_S) / length) ** 2)


def ticks():
    """Impact radiation: raindrops hitting something close make short, decaying bursts of bright noise."""
    out, t = np.zeros(N), np.arange(200) / SR
    for s, db, hz in RAINDROPS:
        click = amp(db + 8.5 - 60 * t / 0.003) * rng.standard_normal(len(t))
        bright = signal.butter(2, [hz, 1.6 * hz], "bandpass", fs=SR, output="sos")
        out[round(s * SR):][:len(t)] = signal.sosfilt(bright, click)
    return out


def widened(pair):
    """Stereo width: a random-phase side signal, set by band and time, makes left and right differ."""
    hz, t, z = signal.stft(pair.mean(0), SR, nperseg=1024)
    share = np.tan(np.arccos(np.clip(along(LIKENESS, hz), 0, 1)) / 2)
    s, *bands_db = np.transpose(SIDE_GAIN)
    width_db = 0
    for one, db in zip(np.eye(3), bands_db):
        weight = along(list(zip(SIDE_HZ, one)), hz)  # 1 at this band's centre, 0 at the others
        width_db = width_db + np.outer(weight, np.interp(t, s, db))
    random_phase = np.exp(2j * np.pi * rng.random(z.shape))
    side_spectrum = z * share[:, None] * amp(width_db) * random_phase
    side = signal.istft(side_spectrum, SR, nperseg=1024)[1][:N]
    return pair + np.array([side, -side])


def wind():
    """Turbulent pressure at two microphone ports: unrelated faint rumbles, stirred up as the car passes."""
    level_db = WIND_DB + DRAUGHT_DB * near(DRAUGHT_S) + 2.2 * wobble(4.0)
    return amp(level_db) * np.array([rush(WIND_COLOUR, depth_db=4.5), rush(WIND_COLOUR, depth_db=4.5)])


def band(centre_hz, width_hz):
    """Quadrature modulation: slow noise carried to a moving centre gives a noise band of rms 1."""
    turn = 2 * np.pi * np.cumsum(centre_hz) / SR
    lowpass = signal.butter(3, width_hz / 2, fs=SR, output="sos")
    slow = signal.sosfilt(lowpass, rng.standard_normal((2, N)))
    return unit(slow[0] * np.cos(turn) + slow[1] * np.sin(turn))


def modes(table):
    """Modal superposition: causal response of (f/Hz, width/Hz, level/dB) resonances of alternating sign."""
    def response(f):
        total = 0
        for k, (centre, width, db) in enumerate(table):
            damping = 1j * f * width
            total = total + (-1) ** k * amp(db) * damping / (centre * centre - f * f + damping)
        return total
    return response


def rush(spectrum, depth_db):
    """Spectral shaping: patchy noise of rms 1 in a given colour."""
    return unit(filtered(patchy(depth_db), lambda hz: amp(along(spectrum, hz))))


def patchy(depth_db):
    """Turbulent intermittency: white noise whose gain varies in patches of time and frequency."""
    z = signal.stft(rng.standard_normal(N), nperseg=512)[2]
    field = uniform_filter1d(rng.standard_normal(z.shape), 5, 0)
    field = uniform_filter1d(field, 10, 1)
    return signal.istft(z * amp(depth_db * unit(field)), nperseg=512)[1][:N]


def filtered(x, response):
    """Linear filtering: multiply the spectrum of x by a complex response of frequency."""
    m = next_fast_len(N + SR // 4)
    return irfft(rfft(x, m) * response(np.fft.rfftfreq(m, 1 / SR)), m)[..., :N]


def wobble(rate):
    """Band-limited fluctuation: a smooth random curve, rate knots a second."""
    return map_coordinates(rng.standard_normal(int(N * rate / SR) + 4), [np.arange(N) * rate / SR])


def curves(*tables):
    """Linear interpolation in time: one curve for each column after t, then a mask of where tables run."""
    t = np.arange(N) / SR
    s, *cols = np.transpose(np.concatenate(tables))
    on = sum((t > rows[0][0] - 0.006) & (t < rows[-1][0] + 0.006) for rows in tables) > 0
    return [np.interp(t, s, c) for c in cols] + [on]


def along(points, hz):
    """Interpolation of (f/Hz, value) points on a logarithmic frequency axis."""
    f, v = np.transpose(points)
    return np.interp(np.log(hz + 1), np.log(f + 1), v)


def panned(x, pan_db):
    """Interaural level difference: left stands pan_db above right."""
    return np.array([x * amp(pan_db / 2), x * amp(-pan_db / 2)])


def amp(db):
    """Decibel definition: the amplitude ratio of a level."""
    return 10 ** (np.asarray(db) / 20)


def unit(x):
    """Normalisation to rms 1."""
    return x / np.sqrt(np.mean(x ** 2) + 1e-20)


def scene():
    """Superposition: car and raindrops are widened together; wind arises at the ports and is added after."""
    exhaust = panned(engine() + pops(), EXHAUST_PAN_DB)
    return widened(tyres() + exhaust + ticks()) + wind()


def record(dry):
    """Band limiting: a wind filter thins the bass, the top is cut off, and sound stops with the last scene."""
    running = np.clip((SCENES[-1][1] - np.arange(N) / SR) / 0.002, 0, 1)

    def response(hz):
        low_cut = (1j * hz / (1j * hz + LOW_CUT_HZ)) ** 2
        return low_cut * (hz < TOP_HZ)

    return filtered(dry, response) * running


dry = scene()
out = record(dry)
dump(out)
```